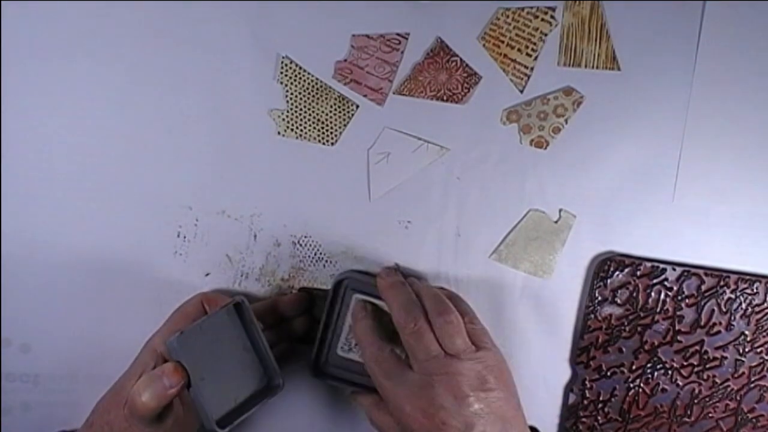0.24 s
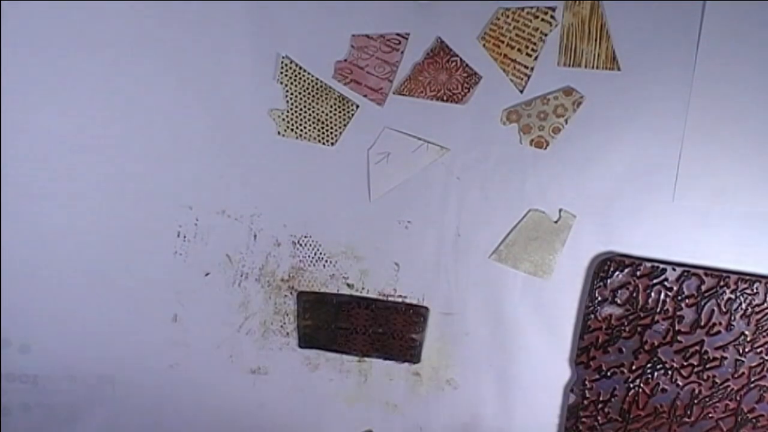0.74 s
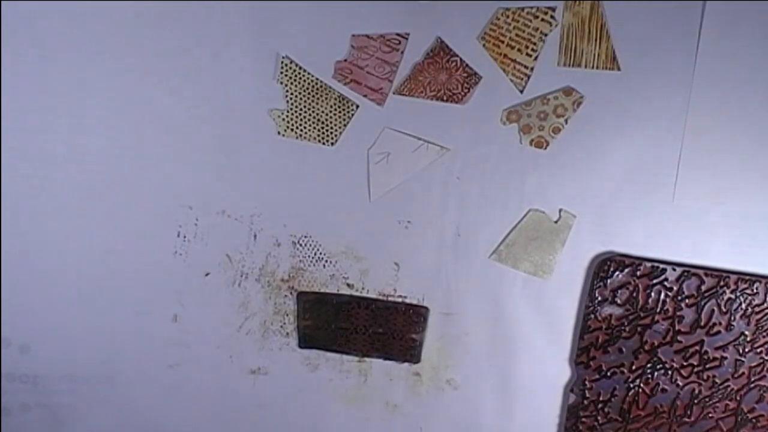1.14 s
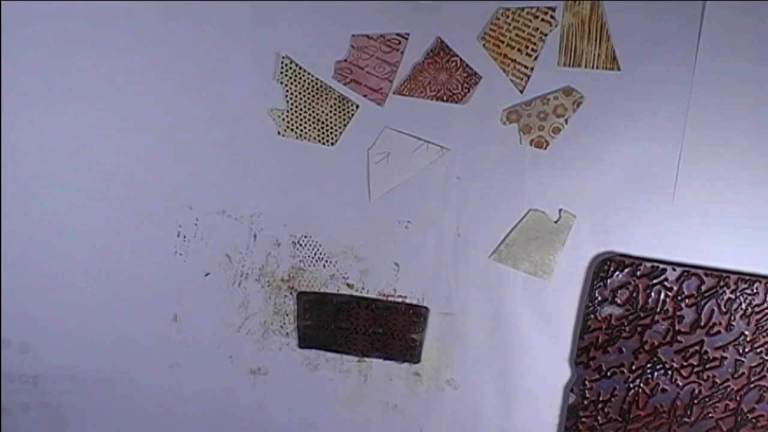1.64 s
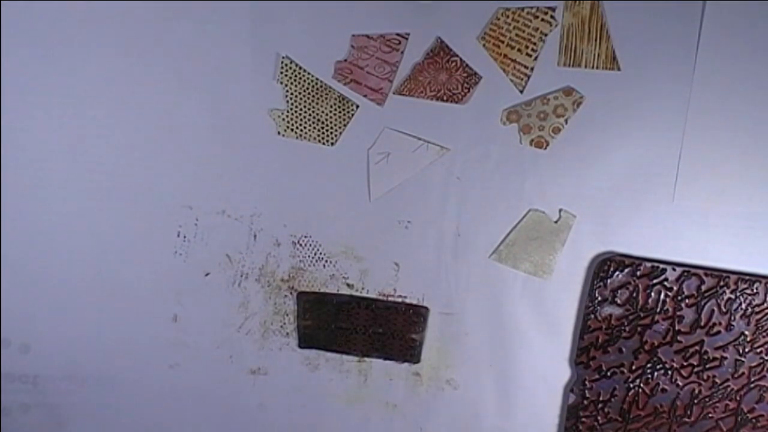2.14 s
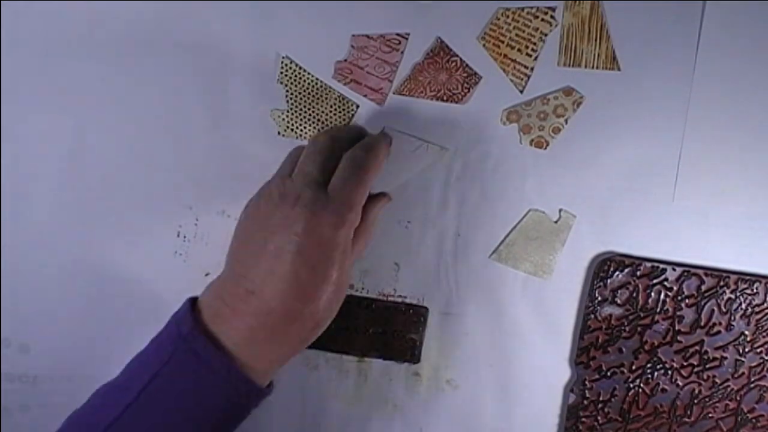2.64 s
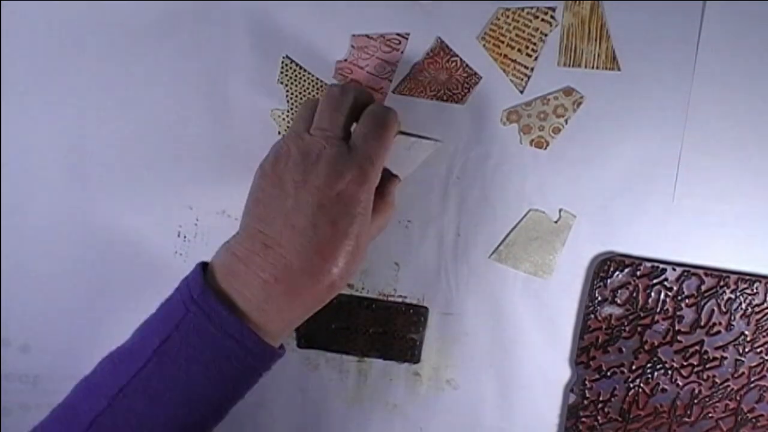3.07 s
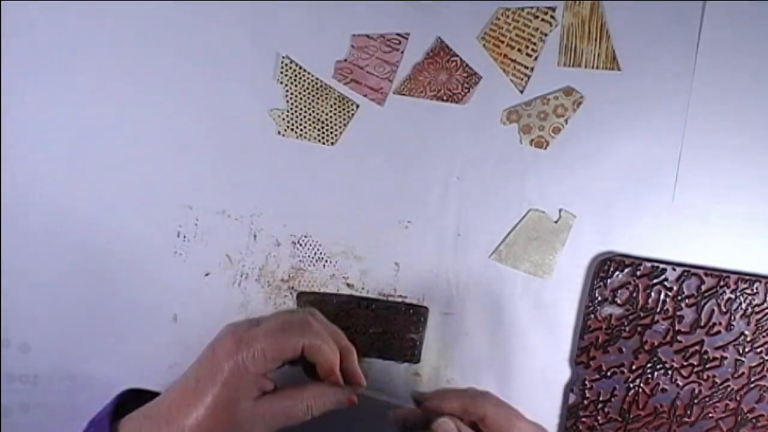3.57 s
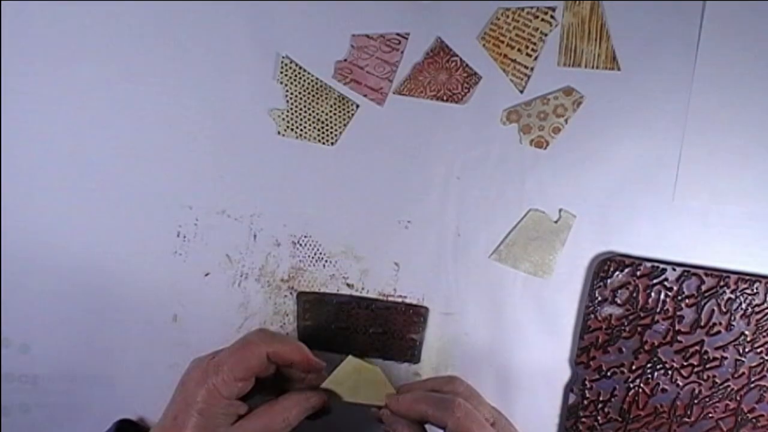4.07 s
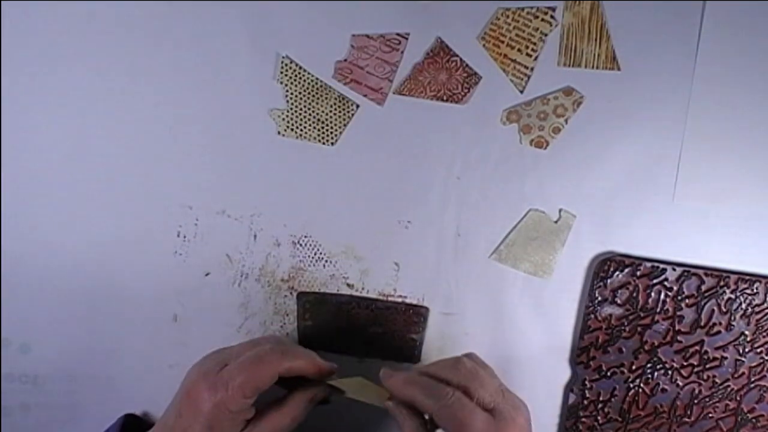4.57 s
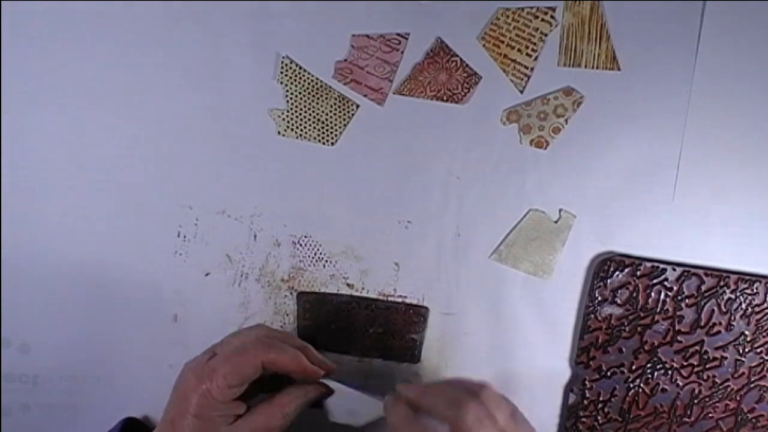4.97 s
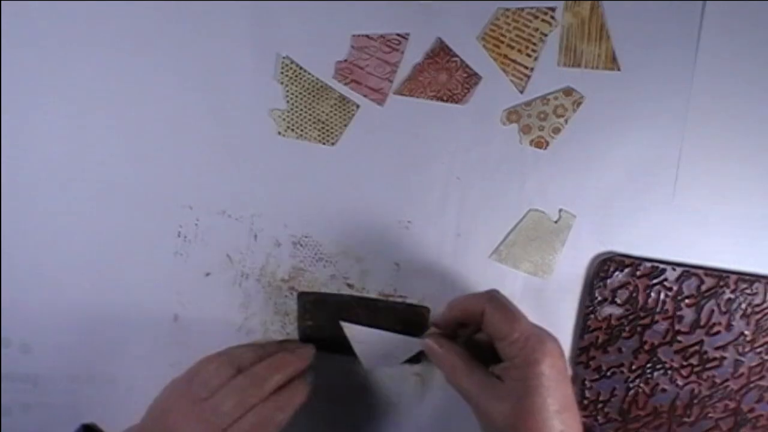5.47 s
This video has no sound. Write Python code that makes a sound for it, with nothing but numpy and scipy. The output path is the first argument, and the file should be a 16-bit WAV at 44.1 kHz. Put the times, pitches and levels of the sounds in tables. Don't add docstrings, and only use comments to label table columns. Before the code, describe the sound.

A plastic ink pad dabs, its lid clacks on and snaps sharply shut, the case thuds onto a hollow tabletop, then paper rustles softly.

```python
import sys
import numpy as np
from scipy import signal
from scipy.fft import rfft, irfft, next_fast_len
from scipy.io import wavfile
from scipy.ndimage import uniform_filter1d

SR = 44100
rng = np.random.default_rng(int(sys.argv[2]) if len(sys.argv) > 2 else 0)


def to_wav(sig):
    pcm = np.clip(np.atleast_2d(sig), -1, 1) * 32767
    pcm = np.round(pcm).astype(np.int16)
    wavfile.write(sys.argv[1], SR, pcm.T)


def gain_from_db(level_db):
    decades = np.asarray(level_db, float) / 20
    return 10 ** decades


N = 251811


def evened(x):
    return x / np.sqrt(np.mean(x ** 2) + 1e-20)


def read(points, hz):
    f, value = np.transpose(points)
    return np.interp(np.log(hz + 1), np.log(f + 1), value)


def add(mix, start_s, sound):
    part = mix[round(start_s * SR):][:len(sound)]
    part += sound[:len(part)]


def colour(x, points):
    size = next_fast_len(len(x) + 4096)
    gain = gain_from_db(read(points, np.fft.rfftfreq(size, 1 / SR)))
    return irfft(rfft(x, size) * gain, size)[:len(x)]


def drift(width):
    once = uniform_filter1d(rng.standard_normal(N), int(width))
    return evened(uniform_filter1d(once, int(width)))


def hiss(points, level_db):
    swell = gain_from_db(level_db + 0.18 * drift(6000))
    return swell * evened(colour(rng.standard_normal(N), points))


# pitch_hz [Hz], level_db [dB per Hz]
SHARED_HISS = [(15, -27), (40, 2), (250, 3.5), (800, -1.5), (2400, -8), (10000, -19.5), (12500, -31),
               (16000, -38)]
WIDE_HISS = [(12, -52), (20, -14), (120, 0.5), (255, 1), (800, -7), (6180, -29.5), (10200, -35),
             (16000, -52.5)]


def camera_hiss():
    return hiss(SHARED_HISS, -63.5), hiss(WIDE_HISS, -56.5)


# time_s [s], level_db [dB]
WHINE_LEVEL = [(0, -90), (2.2, -91), (2.6, -74), (3.3, -70), (4.2, -71.5), (4.7, -75.5), (5.3, -79.5),
               (5.71, -71)]


def camera_whine():
    t = np.arange(N) / SR
    beat = np.cos(2 * np.pi * 24.983 * t - .885 + .4 * drift(900))
    switch = np.clip(.5 + 2.5 * beat, 0, 1)
    whine = np.sin(2 * np.pi * 4800 * t + 0.68 * drift(500))
    return gain_from_db(np.interp(t, *np.transpose(WHINE_LEVEL))) * switch * whine


# pitch_hz [Hz], width_hz [Hz], level_db [dB]
SHELL_RINGS = [(2480, 170, 11), (2700, 220, 6), (3220, 140, 2), (8000, 1000, 3), (8600, 450, -9),
               (10000, 400, -15)]
SEEK_LEVELS = [-63, -58, -60, -64, -59, -68, -70, -58.5, -61, -63.5, -58.5, -61.5]


def camera_motor():
    first_s, every_s, length_s, tooth_s = .408, .4796, .08, .0165
    u = np.arange(round(length_s * SR)) / SR
    burst = 0.55 + .6 * np.sin(np.pi * u / tooth_s) ** 2
    burst *= signal.windows.tukey(len(u), .15)
    gate = np.zeros(N)
    for k, level_db in enumerate(SEEK_LEVELS):
        add(gate, first_s + k * every_s, gain_from_db(level_db) * burst)
    teeth = rng.standard_normal(N) * gain_from_db(2.5 * drift(37))
    shell = np.zeros(N)
    for hz, width_hz, level_db in SHELL_RINGS:
        ring = signal.filtfilt(*signal.iirpeak(hz, hz / width_hz, SR), teeth)
        shell += gain_from_db(level_db) * evened(ring)
    return gate * evened(shell)


# pitch_hz [Hz], time to fall 60 dB fade_s [s]
ROOM_FADE = [(100, 0.086), (300, 0.27), (1000, 0.22), (3000, 0.18), (6000, 0.21), (12000, 0.22)]
# pitch_hz [Hz], level_db [dB]
WALL_COLOUR = [(100, -8.5), (500, -1.5), (1500, -2), (3500, 0.8), (6000, -3), (10000, 0), (14000, -11.5)]


def room(spots):
    taps = np.zeros((6, SR // 2))
    jitter = rng.integers(0, 12, (6, (SR // 2 - 181) // 12))
    at = np.arange(180, SR // 2 - 12, 12) + jitter
    np.put_along_axis(taps, at, rng.choice([-1., 1.], at.shape), 1)
    hz, t, z = signal.stft(taps, SR, nperseg=256)
    decay_db = read(WALL_COLOUR, hz)[:, None] - 60 * t / read(ROOM_FADE, hz)[:, None]
    tail = signal.istft(z * gain_from_db(decay_db), SR, nperseg=256)[1]
    tail = tail.reshape(2, 3, -1) / np.linalg.norm(tail[0])
    return signal.oaconvolve(spots[None], tail, axes=2).sum(1)[:, :N]


def all_round(sound):
    z, hz = rfft(sound, 16384), np.fft.rfftfreq(16384, 1 / SR)
    smooth = np.sqrt(abs(uniform_filter1d(abs(z) ** 2, size=500)))
    smooth = smooth * np.exp(-2j * np.pi * hz * .003)
    treble = 1 / (1 + (700 / (hz + 1)) ** 4)
    return irfft(np.sqrt(1 - treble) * z + np.sqrt(treble) * smooth)[:len(sound)]


# pitch_hz [Hz], level_db [dB]
MIC_COLOUR = [(100, 0), (5000, -1.01), (9000, 2.5), (12000, 1.5), (15000, -11)]


def through_microphone(sound):
    return colour(sound, MIC_COLOUR)


# pitch_hz [Hz], level_db [dB]
SIDE_SHARE = [(60, -11), (250, -13.5), (1000, -15), (3000, -19.5), (5500, -17.5), (8000, -7.5), (14000, -9)]


def near_side(near):
    turned = signal.hilbert(near, next_fast_len(N)).imag[:N]
    return colour(turned + 0.24 * near, SIDE_SHARE)


# peak_s [s], length_s [s], dull_db [dB], bright_db [dB]
BRUSH_STROKES = [(.01, 0.077, -62, -68), (0.162, 0.021, -51, -59), (0.267, 0.14, -56.5, -65),
                 (0.477, 0.26, -63.5, -67), (.59, 0.12, -55, -68), (0.853, 0.089, -52.5, -60.5),
                 (1.147, 0.13, -58, -81), (1.558, 0.1, -54, -61), (2.162, .06, -59, -59.5),
                 (2.593, 0.18, -57.5, -70), (2.687, 0.059, -52.5, -64), (2.776, 0.13, -50, -54.5),
                 (2.88, 0.075, -57, -64.5), (2.966, 0.054, -63.5, -64.5), (3.035, 0.11, -62.5, -62),
                 (3.16, 0.23, -65, -54.5), (3.26, 0.115, -57, -58), (3.75, 0.11, -61.5, -59.5),
                 (2.22, 0.054, -52, -66), (4.88, 0.033, -62, -57), (3.6, .2, -59, -70),
                 (3.805, .2, -59.5, -59.5), (4.088, .12, -63.5, -74), (4.596, .1, -56, -71),
                 (4.686, 0.048, -51.5, -53.5), (4.997, 0.16, -62, -61), (5.33, 0.56, -78.5, -61.5)]
# start_s [s], length_s [s], dull_db [dB], bright_db [dB]
HELD_SLIDES = [(0.892, .12, -63, -75), (1.025, 0.056, -53, -82), (1.342, .2, -64, -75),
               (1.57, 0.28, -62, -73), (2.06, 0.34, -69.5, -77.5), (2.44, 0.11, -62, -85),
               (3.014, 0.287, -65.5, -74.5), (3.38, 0.66, -75, -72.5), (4.23, 0.265, -69, -71.5),
               (4.676, .8, -59.5, -71), (5.46, .3, -63, -72.5), (0.75, .1, -68.5, -87)]


def pressure():
    rise, fall_db = 0.47, 23
    edge_s, sag_db = 0.015, -0.5
    t, power = np.arange(N) / SR, np.zeros((2, N))
    for peak_s, length_s, *level_db in BRUSH_STROKES:
        u = (t - peak_s) / length_s
        away = np.maximum(-u / rise, u / (1 - rise))
        power += gain_from_db(2 * (np.c_[level_db] - fall_db * away))
    for start_s, length_s, *level_db in HELD_SLIDES:
        to_edge_s = np.minimum(t - start_s, start_s + length_s - t)
        held = np.clip(to_edge_s / edge_s, 0, 1)
        sag = sag_db * np.clip((t - start_s) / length_s, 0, 1)
        power += held ** 2 * gain_from_db(2 * (np.c_[level_db] + sag))
    return np.sqrt(power)


# pitch_hz [Hz], level_db [dB]
DULL_SCUFF = [(200, -21), (500, -2.5), (1000, -1.5), (2000, 1.5), (3300, -1.06), (4500, -5.5), (6500, -16),
              (12000, -36)]
BRIGHT_SWISH = [(2000, -30.5), (4000, -2), (6000, -1), (8000, -4), (10500, -8.5), (12500, -17),
                (16000, -29)]


def rubbing():
    out = np.zeros(N)
    for strength, tone in zip(pressure(), (DULL_SCUFF, BRIGHT_SWISH)):
        uneven_db = 1.7 * rng.exponential(1, N) + 2.2 * drift(250)
        slips = rng.standard_normal(N) * gain_from_db(uneven_db)
        out += strength * evened(colour(slips, tone))
    return out


def contact(ms):
    u = np.arange(1, 4097) / SR / (np.clip(ms, .05, 16) / 1000)
    chatter = rng.standard_normal(len(u)) * np.exp(-u) * (1 - np.exp(-6.0 * u))
    z = rfft(chatter)
    return irfft(z / np.sqrt(uniform_filter1d(abs(z) ** 2, size=40)))[:3500]


# start_s [s], level_db (peak) [dB], pitch_hz (ring) [Hz], contact_ms [ms] dull taps of fingers and
# nails on desk and paper, with a faint squeak near 2.4 kHz from 3.3 to 3.5 s
TAPS_OF_FINGERS = [(2.6743, -42, 3370, 3.1), (2.7736, -38.5, 3390, 4.6), (2.845, -60, 2400, 6),
                   (3.31, -52.5, 410, 9), (3.325, -63, 2445, 14), (3.355, -56, 2400, 11),
                   (3.395, -59.5, 2350, 13.4), (3.43, -58, 2350, 12), (3.0, -59.5, 2400, 6),
                   (3.52, -53.5, 2470, 5), (3.705, -55, 1920, 6.2), (4.08, -56.5, 2000, 14),
                   (4.11, -54, 2183, 7.5), (4.195, -61.5, 2400, 5.7), (4.4837, -40, 2080, 1.65),
                   (4.5451, -51, 904, 3.2), (5.171, -39, 970, 1), (4.874, -41.5, 1990, 4),
                   (5.0, -42.5, 1830, 3), (5.2779, -50, 2480, 4), (5.5781, -49.5, 3330, 3.3)]
INK_AND_PAPER_SNAPS = [(.4429, -47, 2700, 5.2), (.4744, -54, 2100, 3.5), (1.5565, -36, 952, .7),
                       (2.156, -51.5, 6940, 2.5), (2.8734, -60.5, 2650, 3.2), (2.967, -52, 3400, 4.8),
                       (3.0301, -53, 3460, 3), (3.8053, -47.5, 2480, 4), (3.824, -42.5, 5880, 6),
                       (4.3844, -48, 3310, 3.6), (4.4106, -43.5, 3550, 4.9), (4.684, -46, 6500, 5.5),
                       (4.69, -43.5, 397, 6), (1.128, -46, 2900, 1.8), (1.178, -50, 4000, 2.5),
                       (4.872, -38.5, 4410, 5.5), (4.93, -46.5, 5800, 3.5), (4.999, -39, 4900, 3.2),
                       (5.09, -45, 4670, 3.3), (5.4, -55, 6500, 19)]
CLICKS_OF_CASE = [(.0566, -46, 1760, 3.8), (.126, -49, 440, 9), (.2324, -57.5, 1710, 6.3),
                  (.269, -47.5, 1750, 2.6), (.333, -60, 1840, 2.5), (.388, -45.5, 1790, 1.0),
                  (.41, -54.5, 2650, 2.8), (.522, -56, 1766, 3.4), (.668, -60.5, 2480, 4.2),
                  (1.128, -46.5, 1870, 3.4), (1.1778, -50, 2800, 2), (1.4331, -47.5, 2500, 3.8),
                  (1.5808, -49.5, 3156, 7.6), (2.14, -55, 2000, 16), (2.058, -56, 4930, 2.7),
                  (2.1, -54, 2000, 14)]


def ticks():
    snap_colour = [(250, -10.5), (900, -2.0), (6000, 2), (11000, -7.0), (14000, -22)]  # (Hz, dB)
    groups = (CLICKS_OF_CASE, -15.5), (TAPS_OF_FINGERS, -12.5), (INK_AND_PAPER_SNAPS, 1.5)
    out, t = np.zeros(N), np.arange(800) / SR
    for rows, snap_db in groups:
        for start_s, peak_db, hz, ms in rows:
            force = contact(ms)
            swing = gain_from_db(-60 * t / (.01 + ms / 500)) * np.sin(2 * np.pi * hz * t)
            ring = signal.fftconvolve(force, swing)[:len(force)]
            snap = evened(colour(force, snap_colour))
            sound = evened(ring) + gain_from_db(snap_db) * snap
            add(out, start_s, gain_from_db(peak_db) * sound / abs(sound).max())
    return out


# start_s [s],
# level_db (peak) [dB], pitch_hz [Hz], time to fall 60 dB fade_s [s]
DAMPED_SWINGS = [(1.2590, -9, 808, .014), (1.2586, -10, 270, .013), (1.2592, -8, 1400, .012),
                 (1.2600, -5, 5770, .006), (1.2586, -7.5, 1810, .018), (1.2598, -11, 3150, .007),
                 (1.2600, -9, 5135, .005), (1.2603, -11, 6200, .004), (1.26005, -12, 1080, .012),
                 (1.2685, -22, 4500, .012), (1.26001, -8, 4400, .006), (1.26, -19, 11000, .003),
                 (1.26, -24, 13400, .003), (1.26, -22, 15200, .002), (2.41, -45, 48, .22),
                 (1.018, -29, 248, .025), (2.2, -55, 44.8, .25), (1.021, -28, 590, .03),
                 (1.259, -28, 90, .03), (2.357, -41, 2700, .015), (2.283, -29, 3400, .035),
                 (2.281, -36, 2750, .02), (2.43, -43, 300, .25), (1.017, -22, 2760, .02),
                 (.739, -35, 1950, .06), (.761, -34, 1560, .07), (.864, -35, 1520, .06),
                 (2.285, -33, 1900, .04), (2.205, -34, 850, .04), (.161, -31, 1000, .02),
                 (.161, -35, 2000, .015), (.72, -44, 3600, .03), (.84, -52, 3400, .08),
                 (2.374, -22, 228, .2), (2.376, -24, 1050, .06), (2.254, -38, 330, .06)]


def thumps():
    out, t = np.zeros((4, N)), np.arange(SR // 2) / SR
    for k, (start_s, peak_db, hz, fade_s) in enumerate(DAMPED_SWINGS):
        fade = gain_from_db(np.maximum(peak_db - 60 * t / fade_s, -200))
        swing = fade * np.sin(2 * np.pi * hz * t) * np.minimum(2 * hz * t, 1)
        add(out[0], start_s, swing)
        add(out[1 + k % 3], start_s, all_round(swing))
    return out


def strike(blows, body, crowd_db):
    body = np.array(body)
    out, t = np.zeros((4, N)), np.arange(SR // 4) / SR
    named_hz = body[:, 0]
    crowd_hz = np.linspace(named_hz[0] ** .5, named_hz[-1] ** .5, num=110) ** 2
    hz = np.append(named_hz, crowd_hz)[:, None]
    in_crowd = np.arange(len(hz)) >= len(body)
    level_db = read(body[:, :2], hz) + crowd_db * in_crowd[:, None]
    fade = gain_from_db(np.maximum(-60 * t / read(body[:, ::2], hz), -200))
    no_bass = signal.butter(6, 0.74 * named_hz[0], "high", fs=SR, output="sos")
    for k, (start_s, peak_db, hard, grip, ms) in enumerate(blows):
        spot = rng.uniform(-1, 1, (len(hz), 2))
        share = np.where(in_crowd, spot[:, 0], np.sign(spot[:, 0]))[:, None]
        swing = np.sin(2 * np.pi * hz * grip * (1 + 0.0072 * spot[:, 1:]) * t)
        hard_db = hard * np.log2(np.minimum(hz, 6000) / 1500)
        ring = (share * gain_from_db(level_db + hard_db) * fade * swing).sum(0)
        sound = signal.sosfilt(no_bass, signal.fftconvolve(contact(ms), ring))
        sound *= gain_from_db(peak_db) / abs(sound).max()
        add(out[0], start_s, sound)
        add(out[1 + k % 3], start_s, all_round(sound))
    return out


# start_s [s], level_db (peak) [dB], hardness [dB per octave],
# grip [factor on pitch], contact_ms [ms]
PAD_BODY = [(59.1, -5, 0.51), (110, 3, 0.24), (146, 11, 0.1), (332, -9.5, 0.37), (630, -0.5, 0.03),
            (1005, 9, 0.018), (1530, -12, 0.028), (2000, 7.5, 0.019), (2940, 4, 0.012), (4100, -2.5, 0.018),
            (6500, -21.5, 0.044), (9660, -22, .01)]
PAD_HITS = [
    (.1605, -22.5, 1.26, 1., 0.78),
    (.233, -46, .1, 0.91, 2.6),
    (.27, -51, .1, 0.95, 8),
]


def ink_pad():
    return strike(PAD_HITS, PAD_BODY, -8.0)


TABLE_BODY = [(195, -34, 0.045), (225.3, 0, .16), (360, -5.5, 0.12), (452, -24, 0.12), (573, -4, 0.084),
              (790, -11.5, 0.12), (942, -4, 0.064), (1528, -10, 0.12), (1926, -6.5, 0.052),
              (2626, -5, 0.044), (3970, -2, 0.012), (6960, -18.5, 0.025), (9760, -26, 0.017),
              (13600, -30, 0.0081)]
TABLE_HITS = [
    (2.199, -38, -3.5, 1.02, 3.4),
    (2.205, -29, -.8, 1.02, 3.2),
    (2.225, -36, -2, 1, 24),
    (2.253, -30.5, -3.5, 0.99, 16),
    (2.281, -23, -.3, 1, 3.4),
    (2.292, -31.5, 3, 0.91, 9.),
    (2.33, -35.5, -4, 0.94, 19),
    (2.357, -44, -2, 0.85, 3),
    (2.3728, -10, .3, 0.99, 1.6),
    (2.384, -17.5, 0.5, 0.99, 13),
]


def tabletop():
    return strike(TABLE_HITS, TABLE_BODY, -0.5)


LID_BODY = [(660, -18, 0.006), (850, -12, 0.04), (1450, -1, .025), (1570, 3.5, 0.018), (2400, -4.5, 0.0083),
            (2750, -14.5, 0.025), (3550, -4, 0.02), (5370, -15, 0.018), (7730, -33, 0.03),
            (9330, -29.5, 0.0098), (12470, -39, 0.0058)]
LID_HITS = [(.7195, -41, 5, 0.97, 5.4), (.7375, -25, -2, 1.09, 1.3), (.76, -27, -3, 0.99, 1.87),
            (.84, -57.5, 30, 1.04, 4.8), (.857, -35.5, -4.5, 0.94, 3.2), (.8625, -29, -3.5, 0.98, 0.84),
            (.988, -16, -1, 1.09, 0.6), (.992, -11, 8.5, 1., 0.55), (.9945, -14, -3, 0.98, 1.27),
            (1.007, -18.5, 3, 1.2, 4.8), (1.014, -12, 20, 1.09, 2.4), (1.0168, -10.5, 6.5, 0.82, 2.2),
            (1.236, -36, 6.5, 1.1, 11), (1.2505, -25, -2.5, 1.4, 1.6)]


def lid():
    return strike(LID_HITS, LID_BODY, -5.0)


LATCH_BODY = [(321, -24, .015), (796, -11.5, 0.036), (1460, -2, 0.022), (1911, -6, 0.0063),
              (2900, -7.5, 0.0033), (3570, -8, 0.008), (4600, -3.5, 0.0055), (5517, 5.5, 0.0055),
              (7590, -3, 0.0037), (10000, -14, 0.0052), (11000, -10, 0.0015), (14460, -17, .004)]
LATCH_HITS = [
    (1.2578, -11, -3, .85, .48),
    (1.2598, -3, .25, .99, .12),
    (1.2612, -9, .65, .96, .86),
    (1.2643, -17, -3, .94, .37),
    (1.269, -24, -1, .76, 1.7),
]


def latch():
    return strike(LATCH_HITS, LATCH_BODY, -8.0)


def scene():
    hits = ink_pad() + tabletop() + lid() + latch() + thumps()
    hits += np.c_[[1, 1, 0, 0]] * (ticks() + rubbing())
    near, echo = through_microphone(hits[0]), room(hits[1:])
    hiss_mid, hiss_side = camera_hiss()
    mid = near + gain_from_db(-14.5) * echo[0] + camera_motor() + camera_whine() + hiss_mid
    side = near_side(near) + gain_from_db(-25.5) * echo[1] + hiss_side
    return np.array([mid + side, mid - side])


def roll_off(x):
    return signal.sosfilt(signal.butter(12, 15800, fs=SR, output="sos"), x)


def record(dry):
    mix = np.clip(dry, -1, 1)
    return roll_off(mix)


dry = scene()
out = record(dry)
to_wav(out)
```